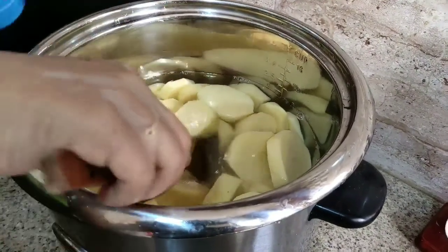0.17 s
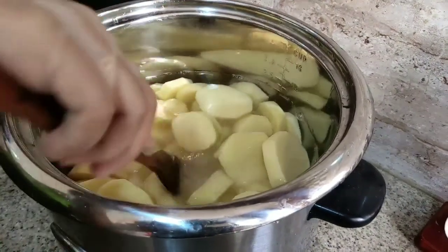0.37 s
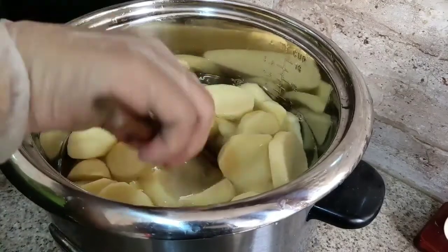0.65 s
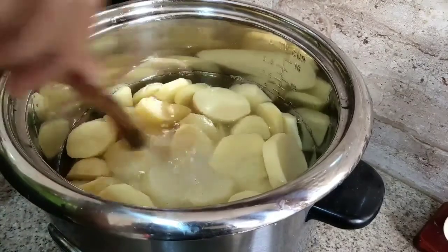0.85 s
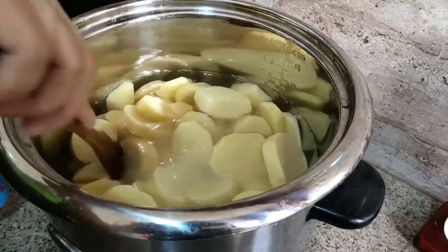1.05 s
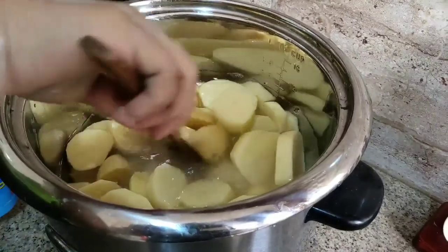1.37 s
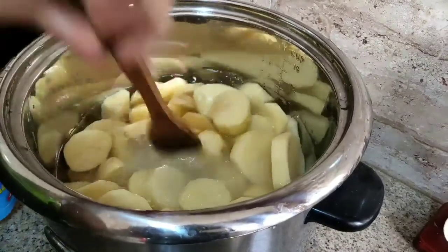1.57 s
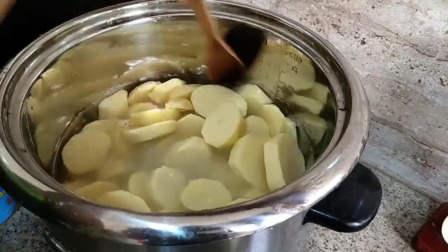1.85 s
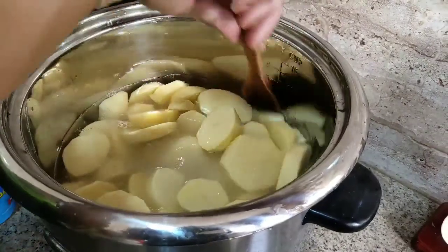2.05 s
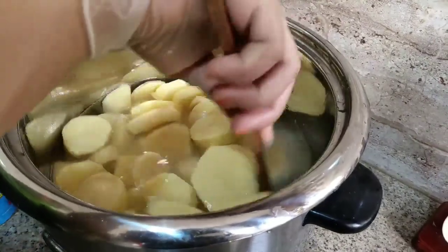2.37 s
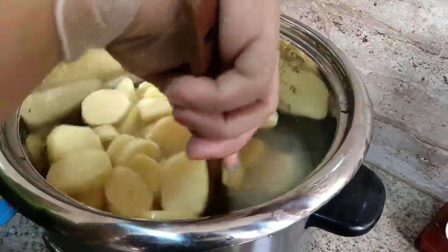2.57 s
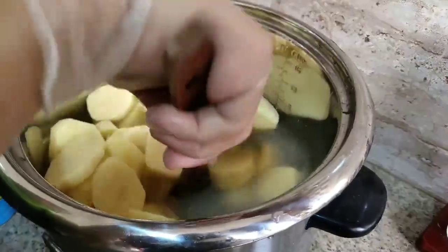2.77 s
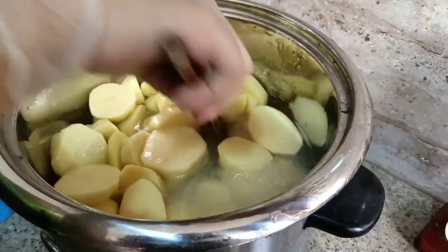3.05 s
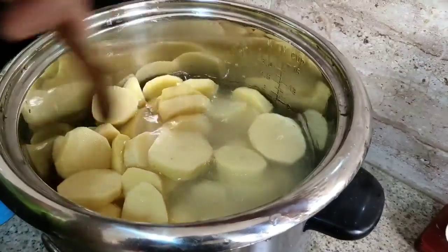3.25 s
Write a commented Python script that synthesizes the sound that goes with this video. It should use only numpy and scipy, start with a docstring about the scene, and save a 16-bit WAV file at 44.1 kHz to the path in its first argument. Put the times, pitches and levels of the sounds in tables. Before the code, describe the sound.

Close stereo pickup of a spoon pushing wet potato slices through water in a metal pot, strongest clacks and snaps early, a quiet pause, then softer rubbing and thuds; faint room hum and one brief dropout.

```python
"""In a small kitchen, close by, a wooden spoon stirs sliced potatoes in a steel pot of water.
Knocks and thuds excite the damped modes of the wall and of the full pot; shaped noise rumbles below.
Air pockets pop as rising, decaying sines behind a snap of noise; rubs are swells of grains and hiss.
Water swishes as fluttering noise with grains, bubbles and ticks, over a low hum of filtered noise.
The sound cuts out once, briefly."""
import sys
import numpy as np
from scipy import signal
from scipy.fft import rfft, irfft
from scipy.io import wavfile
from scipy.ndimage import uniform_filter1d

SR = 44100
rng = np.random.default_rng(int(sys.argv[2]) if len(sys.argv) > 2 else 0)


def persist_wave(psi):
    """Save psi, clipped to +-1, as 16-bit WAV."""
    counts = np.round(np.clip(psi, -1, 1) * 32767).astype(np.int16)
    wavfile.write(sys.argv[1], SR, np.atleast_2d(counts).T)


N = 149940  # length of the scene [samples]


def knocks():
    """Modal excitation: the spoon cracks and rings the wall's main modes among a dense mass of others."""
    # spoon against the pot: (time [s], level [dB], centre of the contact's colour [Hz],
    # its spread [octaves], ring t60 [s])
    knock_table = [(.2157, -34, 1140, 1.64, .23), (.219, -39.5, 2130, 0.29, 0.36),
                   (.64, -41.5, 2460, 0.12, 0.62), (.6481, -41.5, 645, 1.5, 0.17),
                   (.886, -44, 1530, 0.16, .15), (1.0994, -50.5, 696, 1.8, 0.14),
                   (1.137, -48.5, 584, 0.9, .18), (1.2976, -40.5, 570, 0.73, 0.28),
                   (1.353, -41.5, 1660, 0.34, 0.54), (2.03, -53.5, 444, 0.56, 0.32),
                   (2.272, -50, 1030, .36, 0.36), (2.532, -51.5, 1250, 0.44, .06),
                   (2.554, -43.5, 805, 1.14, 0.25), (2.6318, -47.5, 2100, 0.36, 0.27),
                   (2.876, -49.5, 664, 1.34, 0.51)]
    # modes of the water-damped wall: (frequency [Hz], relative level [dB])
    wall_modes = [(250, 6.5), (320, 4.5), (446, 0.5), (550, -6.5), (640, -2.5), (840, 1.5), (988, 2),
                  (1025, 0), (1065, 6), (1140, -6), (1335, -2.5), (1942, -5), (2102, -5), (2153, -7.5),
                  (2285, -16.5), (2362, -3.5), (2450, -7)]
    wall_scatter = 0.008  # the moving water detunes the wall from knock to knock (rms ratio)
    wall_sag, wash_s = 0.01, 0.067  # rms ratio and time constant of the pitch slide while it rings
    dense_db, crack_db, crack_s = -1.5, -0.5, 0.0097  # dense modes re main modes; added initial crack
    dense_colour = [(120, -16.5), (250, -0.5), (2400, -7), (3200, -12.0), (8000, -13.5)]

    out, t = np.zeros((2, N)), np.arange(SR // 2) / SR
    f, mode_db = np.array(wall_modes).T
    for s, db, hz, octaves, t60 in knock_table:
        phase = 2 * np.pi * rng.random((2, len(f), 1))
        tuned = f * (1 + wall_scatter * rng.standard_normal(len(f)))
        # each mode slides up or down as water washes up the wall or drains off
        slide = wall_sag * rng.standard_normal((len(f), 1))
        slid = t + slide * (t - wash_s * (1 - np.exp(-t / wash_s)))
        sines = np.sin(2 * np.pi * tuned[:, None] * slid + phase)
        modes = spread((undb(mode_db)[:, None] * sines).sum(axis=1))
        dense = colour(noise(size=len(t)), dense_colour)
        force = contact(freqs(t), hz, octaves)
        ring = irfft(rfft(unit(modes)) * force, len(t))
        crack = irfft(rfft(unit(dense)) * force, len(t))
        crack_gain = undb(dense_db) + undb(crack_db) * np.exp(-t / crack_s)
        onset = 1 - np.exp(-t / 0.00024)
        hit = (ring + crack * crack_gain) * fade(t, t60) * onset
        # level over the first 20 ms, in each channel
        add(out, s, undb(db) * hit / hit[:, :SR // 50].std(axis=1, keepdims=True))
    return out


def thuds():
    """Modal excitation at low frequency: soft blows of slices on the bottom set the pot booming."""
    # slices shoved against the bottom: (time [s], level [dB], centre of the contact's colour [Hz])
    thud_table = [(0.192, -43, 70.6), (.335, -52, 201), (.59, -45.5, 91), (.652, -48, 272),
                  (0.716, -45.5, 88), (1.098, -39, 207), (1.144, -38, 92), (1.302, -41, 129.6),
                  (2.023, -44, 203), (2.29, -41, 149), (2.557, -48, 199), (2.741, -50, 123),
                  (2.9, -45, 134), (3.053, -43.5, 85)]
    # modes of the full pot on the counter: (frequency [Hz], relative level [dB], t60 [s])
    body_modes = [(72.6, 1, 0.41), (90.55, 7, 0.56), (146.9, -11.5, 0.97), (165, -9, 0.73),
                  (209.5, 2.5, 0.13), (246.4, -3, 0.31), (279.3, -3, 0.24)]

    out, t = np.zeros(N), np.arange(SR // 2) / SR
    for s, db, hz in thud_table:
        detune = 1 + 0.017 * rng.standard_normal(len(body_modes))
        hit = np.zeros(len(t))
        for (f, mode_db, t60), ratio in zip(body_modes, detune):
            sine = np.sin(2 * np.pi * (f * ratio * t + rng.random()))
            hit += undb(mode_db) * contact(f, hz, octaves=0.88) * sine * fade(t, t60)
        hit = hit * (1 - np.exp(-t / 0.0011))  # soft onset
        add(out, s, undb(db) * hit / hit[:SR // 30].std())
    return out


def push_rumble():
    """Noise under an envelope: the spoon pushing through the slices rumbles with its effort."""
    # push of the spoon: (time [s], level of the rumble before its trim [dB])
    push_curve = [(0, -64), (.2, -47.5), (.35, -50), (.52, -51), (.7, -51), (.85, -51), (1.04, -64),
                  (1.2, -53), (1.45, -51.5), (1.62, -53.5), (1.9, -65), (2.1, -48.5), (2.38, -49),
                  (2.65, -52), (2.85, -51.5), (3.05, -48), (3.22, -45.5), (3.4, -60)]
    # spectrum of the rumble: (frequency [Hz], relative level [dB])
    rumble_spectrum = [(25, -25), (48, -20.5), (68, 2.5), (80, 7.5), (90, 2.5), (104, -17), (155, -9),
                       (250, -8), (400, -19), (900, -68)]
    trim_db = -1
    return undb(trim_db) * curve(push_curve) * unit(colour(noise(size=N), rumble_spectrum))


def pops():
    """Cavity resonance: a film of water snaps, the pocket behind it rings and the pot's walls reflect it."""
    # air pockets bursting between wet slices: (time [s], level of the main ring [dB], pitch [Hz],
    # t60 [s], level of the snap [dB re main ring])
    pop_table = [(.6458, -19.5, 3900, 0.0021, -16), (.7232, -29.5, 3440, .014, -12.5),
                 (.747, -42.5, 3630, 0.01, -11), (.789, -46, 3510, 0.02, -16),
                 (.807, -47, 4000, 0.014, -13), (0.8862, -32, 3990, 0.011, -2.5),
                 (.912, -49, 3600, .02, -13), (.913, -45, 5180, 0.024, -2), (.942, -48, 4120, .019, -20),
                 (1.045, -59, 4700, .017, -11), (1.113, -45.5, 5300, 0.0066, 0),
                 (1.17, -51, 3400, .01, -10), (1.255, -44.5, 5600, .012, -6),
                 (1.2987, -35, 2640, .0088, -1), (1.321, -42, 4670, 0.031, -0.5),
                 (1.3524, -22, 3750, 0.0055, -14.5), (1.3545, -27.5, 3440, 0.0024, -17),
                 (1.3534, -30.5, 1600, 0.02, -24), (1.388, -51, 4200, .0065, 8),
                 (1.474, -40.5, 3450, 0.0088, 0.5), (2.02, -50, 3320, 0.0029, 9),
                 (2.2, -49, 3800, 0.012, -20), (2.487, -38.5, 3680, 0.0072, -2.5),
                 (2.5307, -36, 3480, 0.011, -5.5), (2.53, -39.5, 1380, 0.015, -24),
                 (2.876, -39.5, 4110, 0.015, -9), (2.89, -39, 4320, 0.0081, -2.5),
                 (2.951, -50, 2770, 0.0085, 3), (3.042, -33, 3730, .0094, -25),
                 (3.054, -38, 4800, .008, -9), (3.082, -42, 3400, .01, -18),
                 (3.292, -51.5, 3625, 0.037, -18), (3.302, -52, 4870, 0.022, -25)]
    pocket_ratio, pocket_db = 1.288, -11  # a flat pocket has a second, higher resonance
    pocket_scatter = 0.1  # no two pockets have the same shape (rms ratio)
    snap_s = 0.0054  # time constant of the snap
    snap_colour = [(400, -24), (2500, 13), (6500, 12.5), (10000, 10.5), (16000, -29)]

    out = np.zeros((2, N))
    for s, db, hz, t60, snap_db in pop_table:
        second_hz = hz * pocket_ratio * (1 + pocket_scatter * rng.standard_normal())
        ring = bubble(hz, t60) + undb(pocket_db) * bubble(second_hz, t60)
        snap_fade = np.exp(-np.arange(len(ring)) / SR / snap_s)
        snap = colour(noise(size=len(ring)), snap_colour) * snap_fade
        # the peak of noise is taken as twice its rms
        pop = ring + undb(snap_db) * snap / snap[:, :SR // 1000].std() / 2
        reflected = echo(pop, db=-3, t60=0.011, lag=0.000957)
        add(out, s, undb(db) * pan(left_db=1) * reflected)
    return out


def rubs():
    """Stick-slip friction: each rub is a short swell of gritty slips, hiss and ticking edges."""
    # wet slices rubbing on spoon and wall: (time of the middle [s], level before the swell [dB],
    # width of the swell at exp(-1/2) of its top [s], centre of the colour [Hz])
    rub_table = [(0.207, -52.5, 0.15, 6100), (0.347, -49.5, 0.0071, 4020), (0.495, -52.5, 0.015, 2500),
                 (0.581, -50.5, 0.023, 6070), (0.675, -51, 0.028, 3000), (1.128, -50.5, 0.022, 5700),
                 (1.19, -57.5, .03, 6400), (1.397, -53, 0.016, 2500), (1.483, -50.5, 0.028, 3640),
                 (1.521, -51.5, 0.022, 2560), (1.624, -53, 0.0035, 4900), (2.21, -59, .025, 3240),
                 (2.284, -55, 0.036, 2930), (2.366, -64.5, 0.13, 3050), (2.466, -57, 0.03, 3300),
                 (2.654, -55, 0.01, 2500), (2.655, -48, 0.006, 4600), (2.681, -50.5, 0.015, 1200),
                 (2.687, -51.5, 0.0096, 4000), (2.71, -49, 0.013, 3370), (2.899, -53.5, 0.055, 4000),
                 (2.903, -50.5, 0.022, 704), (2.966, -51, 0.033, 3380), (2.973, -56.5, 0.054, 550),
                 (3.06, -49.5, 0.056, 3500), (3.076, -51.5, 0.042, 580), (3.094, -62, 0.025, 3660)]
    hiss, tick_db = 0.87, -5  # gain of the noise among the grains; level of the ticks
    slip_s, grit_db = 0.003, 1  # stick and slip within a rub: smoothing time, rms depth

    out, t = np.zeros((2, N)), np.arange(N) / SR
    slips = unit(grit(rate=800) + hiss * noise(size=N)) + undb(tick_db) * ticks(rate=420)
    slips = slips * flicker(slip_s, grit_db)
    size = SR * 2 // 5
    for s, db, width, hz in rub_table:
        i = min(max(int(s * SR) - size // 2, 0), N - size)
        part = slips[:, i:i + size]
        rub = irfft(rfft(part) * contact(freqs(part), hz, octaves=1), size)
        swell = np.exp(-2 * ((t[i:i + size] - s) / width) ** 2)
        add(out, i / SR, undb(db) * unit(rub) * swell)
    return out


def slosh():
    """Turbulence and bubble resonance: swish, crackle, bubbles and ticks all follow the stirring."""
    # vigour of the stirring: (time [s], reference level of the water [dB])
    swish_curve = [(0, -57.5), (.13, -58.5), (.24, -52.5), (.32, -53), (.53, -58), (.62, -56), (.68, -48.5),
                   (.78, -53), (.86, -59), (.93, -57), (1.0, -68.5), (1.08, -66.5), (1.15, -54.5),
                   (1.28, -56.5), (1.39, -46.5), (1.45, -53), (1.54, -58.5), (1.7, -68), (1.98, -70),
                   (2.06, -59), (2.3, -63.5), (2.42, -62), (2.61, -56.5), (2.72, -54.5), (2.84, -61),
                   (2.92, -56), (3.1, -52.5), (3.18, -59), (3.4, -70)]
    # spectrum of the water: (frequency [Hz], relative level [dB])
    water_spectrum = [(150, 0.5), (400, 1), (1000, -2), (2000, -2), (3600, -1.5), (5500, -7), (8000, -8),
                      (12000, -17), (16000, -23)]
    # levels re the stirring curve [dB]
    swish_db, grain_db, bubble_db, gurgle_db, tick_db = -1.2, -11.5, -16, -8, -7

    swish = undb(swish_db) * unit(colour(noise(size=N), water_spectrum))
    crackle = undb(grain_db) * unit(colour(grit(rate=490), water_spectrum))
    wash = flutter(swish + crackle)
    fizz = undb(bubble_db) * bubbles(rate=470, centre_hz=3768, cycles=240)
    # larger bubbles under the slices
    gurgle = undb(gurgle_db) * bubbles(rate=65, centre_hz=757, cycles=11)
    return curve(swish_curve) * (wash + fizz + gurgle + undb(tick_db) * ticks(rate=85))


def bubbles(rate, centre_hz, cycles):
    """Superposed resonators: bubbles at random moments, pitch and strength drawn independently."""
    range_octaves, range_db = 2.4, 14
    out = np.zeros(N)
    for when, pitch, weakness in rng.random((int(rate * N / SR), 3)):
        hz = centre_hz * 2 ** (range_octaves * (pitch - .5))
        # the t60 is a fixed number of cycles
        add(out, when * N / SR, undb(-range_db * weakness) * bubble(hz, cycles / hz))
    return unit(out)


def bubble(hz, t60):
    """Damped resonance of a pocket of air: its pitch rises a little; it sounds for at most 50 ms."""
    rise_per_s = 4  # frequency gained per second, as a share of hz
    t = np.arange(SR // 20) / SR
    return np.sin(2 * np.pi * hz * t * (1 + rise_per_s * t / 2)) * fade(t, t60)


def ticks(rate):
    """Impulsive release: slice edges let go at random moments, each a very short ring of its own pitch."""
    centre_hz, range_octaves, cycles, range_db = 3930, 1.5, 28, 12
    out = np.zeros((2, N))
    for when, pitch, weakness, angle in rng.random((int(rate * N / SR), 4)):
        hz = centre_hz * 2 ** (range_octaves * (pitch - .5))
        # random signed gains of the two channels
        place = np.array([[np.cos(2 * np.pi * angle)], [np.sin(2 * np.pi * angle)]])
        add(out, when * N / SR, undb(-range_db * weakness) * place * bubble(hz, cycles / hz))
    return unit(out)


def grit(rate):
    """Shot noise: tiny slips of wet surfaces, at random moments and of random strength."""
    spread_db = 1.5
    sizes = undb(spread_db * np.minimum(rng.exponential(size=N), 4))
    slipping = rng.random(N) < rate / SR
    return spread(slipping * sizes * rng.standard_normal((2, N)))


def flutter(x):
    """Amplitude modulation by bands: each octave's level wavers quickly on its own."""
    spectrum, out = rfft(x), 0
    octave = np.log2(np.clip(freqs(x), 2 ** 8, 2 ** 14))
    for k in range(8, 15):
        # overlapping triangular bands add up to the whole spectrum
        band = irfft(spectrum * np.maximum(1 - abs(octave - k), 0), N)
        out = out + flicker(seconds=0.011, db=2.0) * band
    return out


def room_hum():
    """Stationary noise: the low hum of the room is noise with a fixed spectrum."""
    # spectrum of the room: (frequency [Hz], relative level [dB])
    room_spectrum = [(25, -10.5), (50, -1.5), (70, -15.5), (92, 12.5), (112, 0.5), (150, 3), (250, -11),
                     (500, -8.5), (1000, -10.5), (2000, -15.5), (4000, -30), (8000, -37), (16000, -39)]
    hum_db = -53
    return undb(hum_db) * unit(colour(noise(size=N), room_spectrum))


def echo(x, db, t60, lag):
    """Reverberation: dense reflections start after lag seconds and die away."""
    t = np.arange(SR // 2) / SR
    tail = colour(noise(size=len(t)), [(200, 2.0), (4500, 2.0), (16000, -17)])
    tail = tail * fade(t, t60) * (t > lag)
    response = unit(tail) / np.sqrt(2 * len(t))  # energy 1 over both channels
    return x + undb(db) * signal.fftconvolve(x, response, axes=1)[:, :x.shape[-1]]


def contact(f, hz, octaves):
    """Force spectrum: the share of a contact's force at frequency f, greatest at hz."""
    return 1 / (1 + (np.log2(f / hz) / octaves) ** 2 / 2) ** 2


def fade(t, t60):
    """Exponential decay: a fall of 60 dB in t60 seconds."""
    return np.exp(-np.log(1000) * t / t60)


def flicker(seconds, db):
    """Random modulation: a gain that wanders by db (rms), smoothed twice over the given time."""
    width = max(int(seconds * SR), 1)
    smooth = uniform_filter1d(uniform_filter1d(rng.standard_normal(N), width), width)
    return undb(db * unit(smooth))


def noise(size):
    """White noise: equal power at all frequencies, in stereo."""
    return spread(rng.standard_normal((2, size)))


def spread(pair):
    """Interchannel coherence: two unrelated signals become alike in the bass, different in the treble."""
    wide_hz = 930  # the channels differ mostly above this
    f = freqs(pair)
    mid, side = rfft(pair)
    wide = f / np.hypot(f, wide_hz)
    both = mid + np.array([[1], [-1]]) * wide * side
    return irfft(both / np.sqrt(1 + wide ** 2), pair.shape[-1])


def pan(left_db):
    """Level difference: channel gains for a sound that is left_db louder on the left."""
    return undb(left_db * np.array([[.5], [-.5]]))


def colour(x, points):
    """Linear filtering: shape x by points (frequency [Hz], gain [dB]), joined over log frequency."""
    hz, db = np.array(points).T
    gain = undb(np.interp(np.log(freqs(x)), np.log(hz), db))
    return irfft(rfft(x) * gain, x.shape[-1])


def freqs(x):
    """Fourier analysis: the frequencies of x's spectrum [Hz], at least 1."""
    return np.maximum(np.fft.rfftfreq(x.shape[-1], 1 / SR), 1)


def curve(rows):
    """Envelope: gain along rows of (time [s], level [dB])."""
    return undb(np.interp(np.arange(N) / SR, *np.array(rows).T))


def undb(db):
    """Logarithmic level: decibels to amplitude gain."""
    return 10 ** (np.asarray(db) / 20)


def unit(x):
    """Effective value: scale x to rms 1."""
    return x / np.sqrt(np.mean(x ** 2) + 1e-20)


def add(out, s, x):
    """Superposition: mix x into out from time s [s]."""
    i = min(max(int(s * SR), 0), N)
    out[..., i:i + x.shape[-1]] += x[..., :N - i]


def scene():
    """Superposition of pot, water with its room reflections, and hum, a little to the left."""
    pot = knocks() + thuds() + push_rumble()
    water = echo(pops() + rubs() + slosh(), db=-9, t60=0.11, lag=0.0053)
    return (pot + water + room_hum()) * pan(left_db=2.5)


def record(dry):
    """Gating and low-pass filtering: the sound fades out fast, returns at once, and loses its top."""
    silence_start_s, silence_end_s, fade_s = 0.3562, 0.4945, 0.0034
    top_hz = 16100
    t = np.arange(N) / SR
    fading = np.exp(-np.maximum(t - silence_start_s, 0) / fade_s)
    gate = np.where(t < silence_end_s, fading, 1)
    low_pass = signal.ellip(10, .2, 80, top_hz, fs=SR, output="sos")
    return signal.sosfilt(low_pass, dry * gate)


dry = scene()
out = record(dry)
persist_wave(out)
```